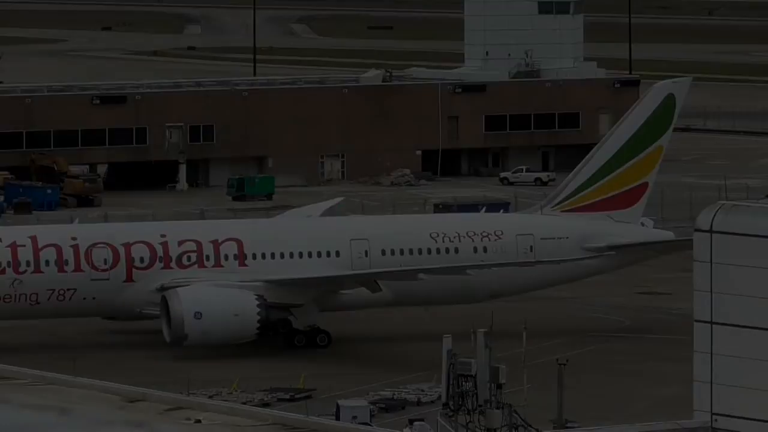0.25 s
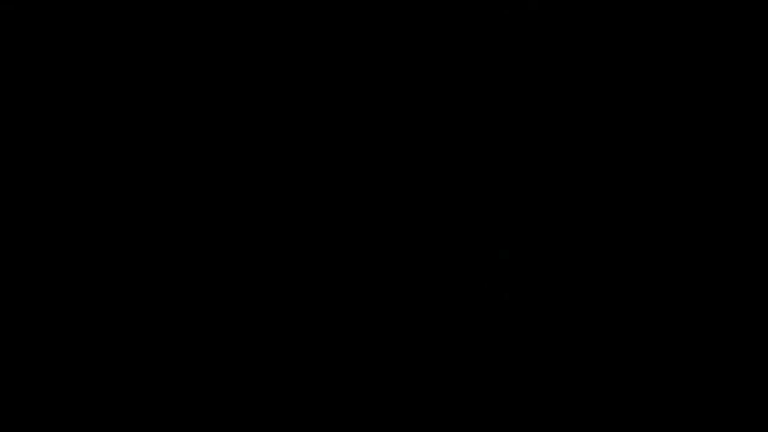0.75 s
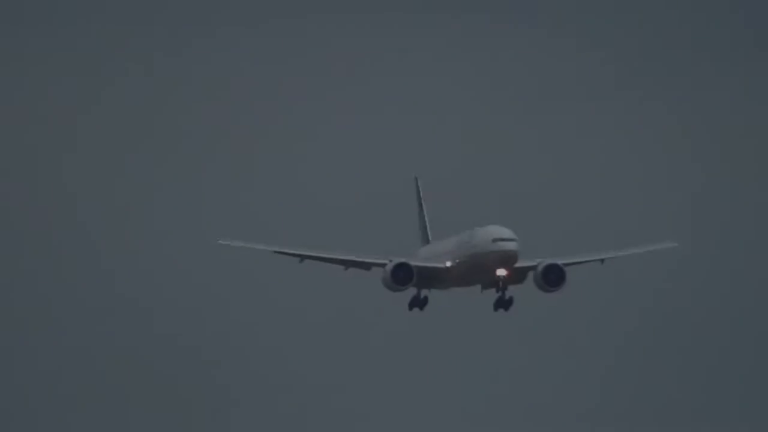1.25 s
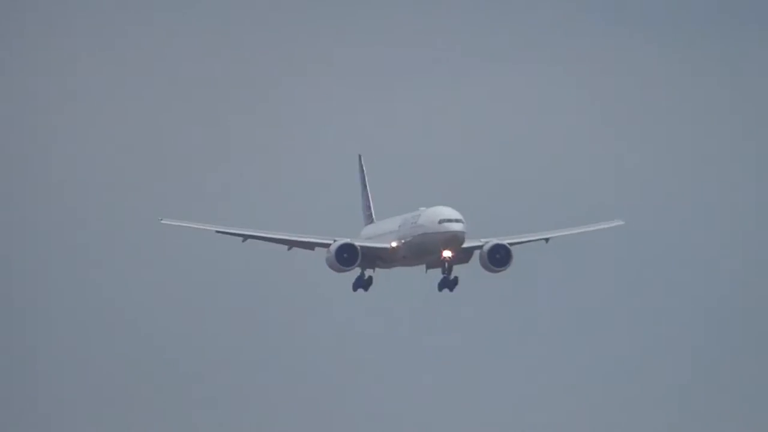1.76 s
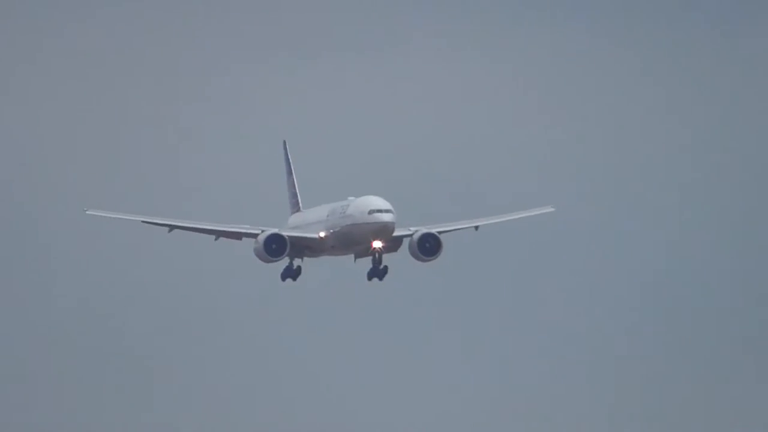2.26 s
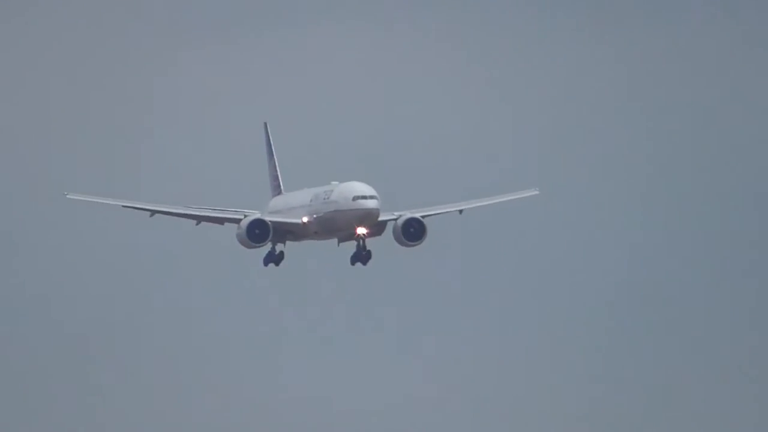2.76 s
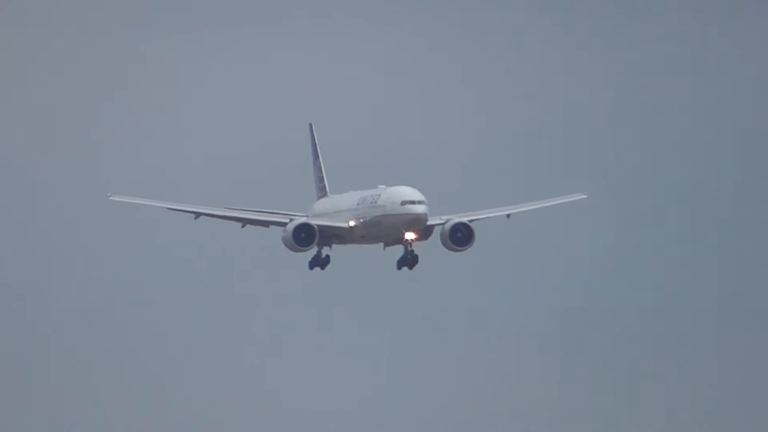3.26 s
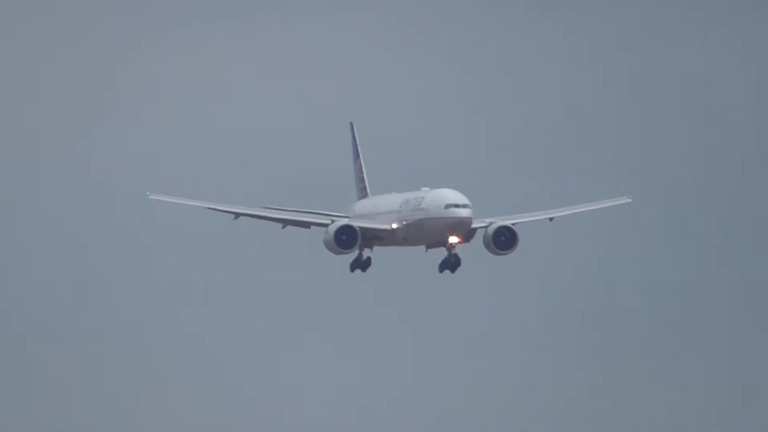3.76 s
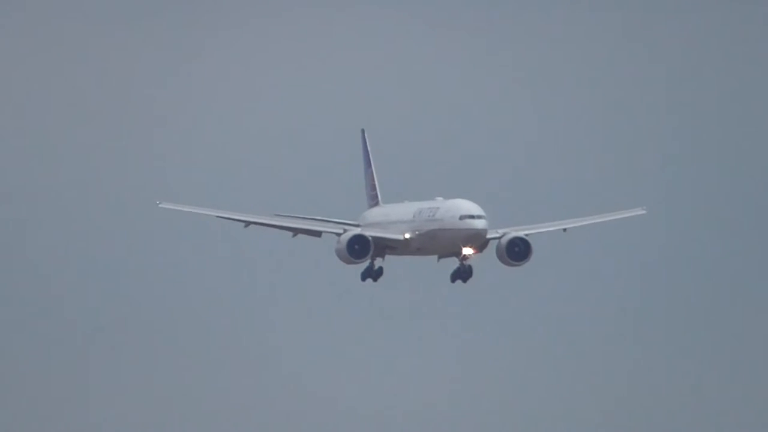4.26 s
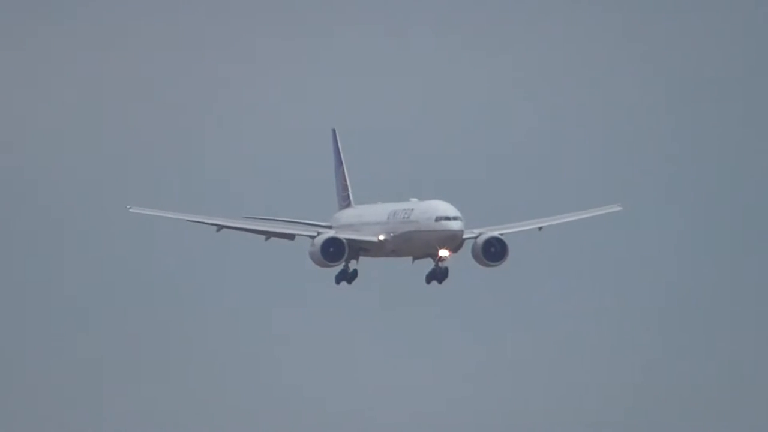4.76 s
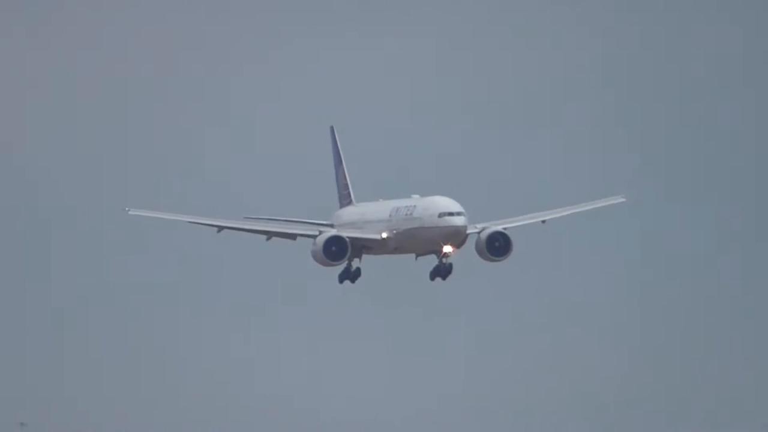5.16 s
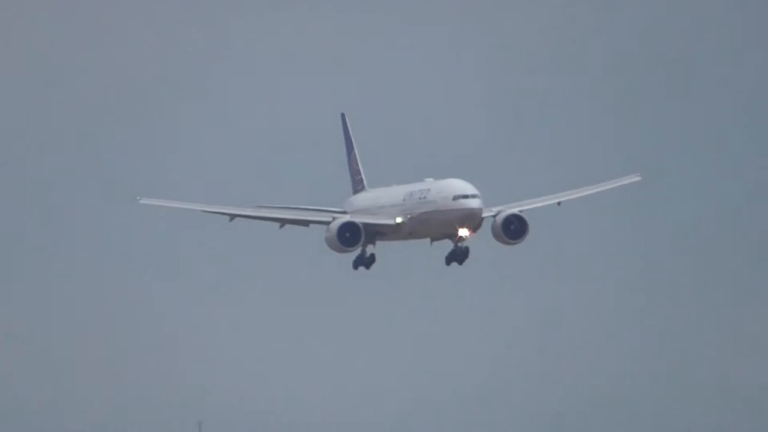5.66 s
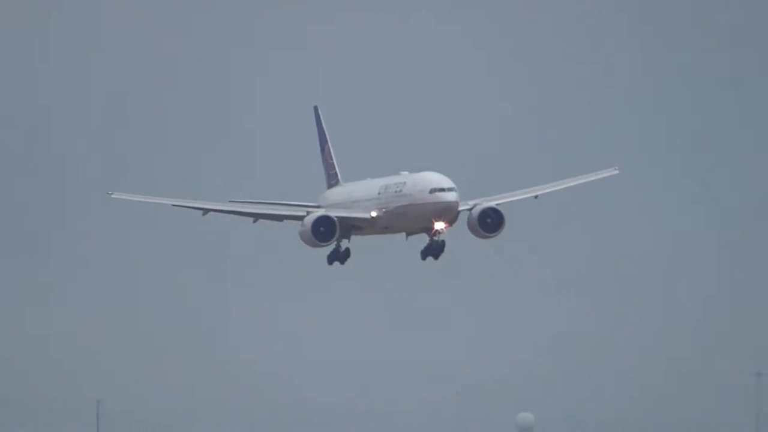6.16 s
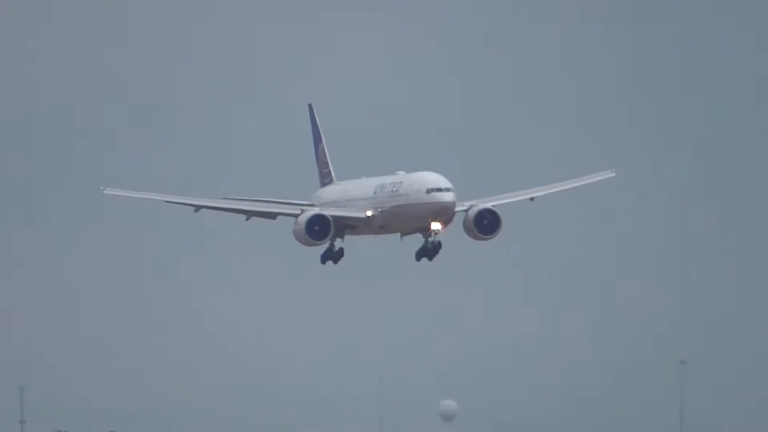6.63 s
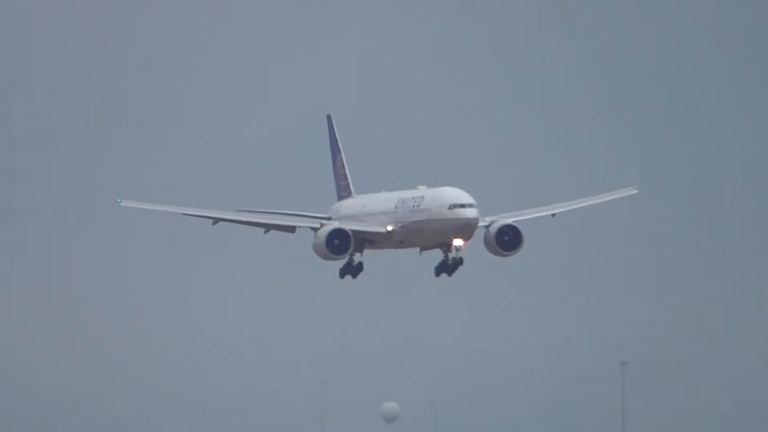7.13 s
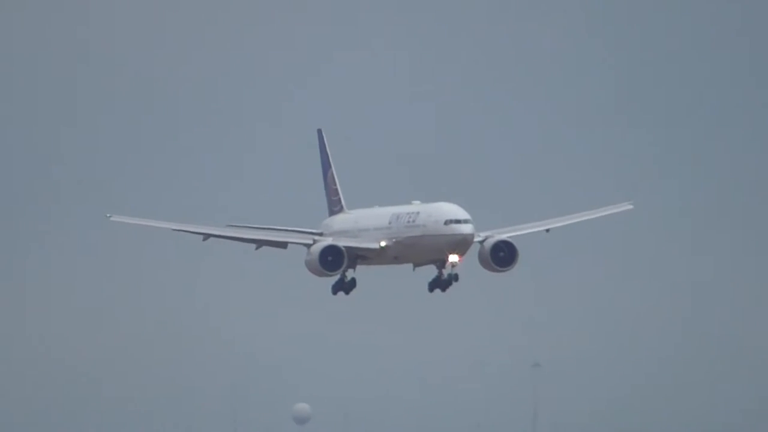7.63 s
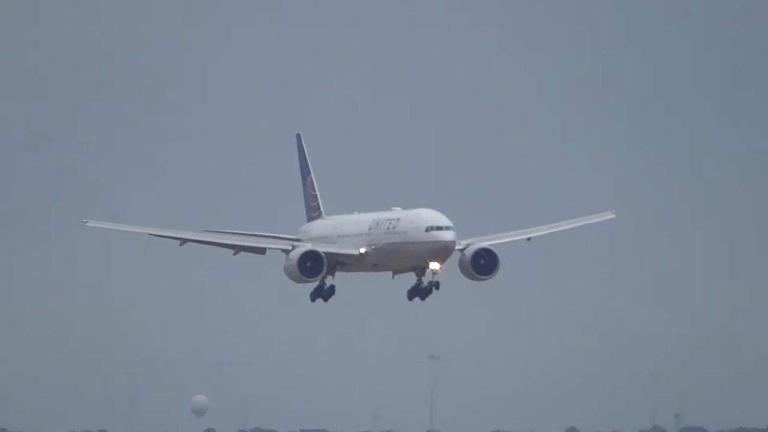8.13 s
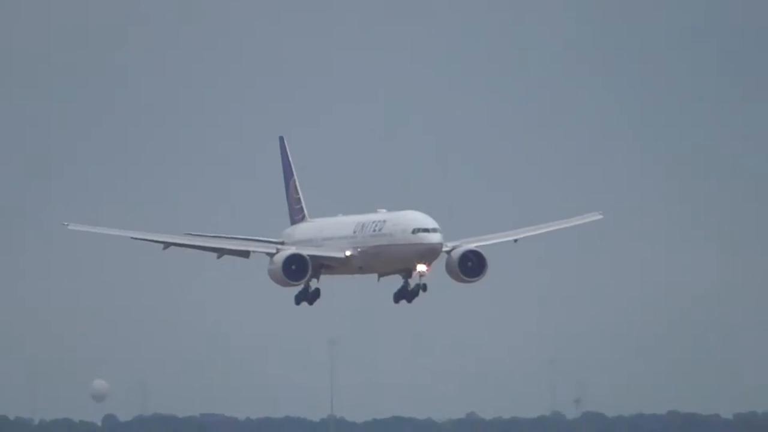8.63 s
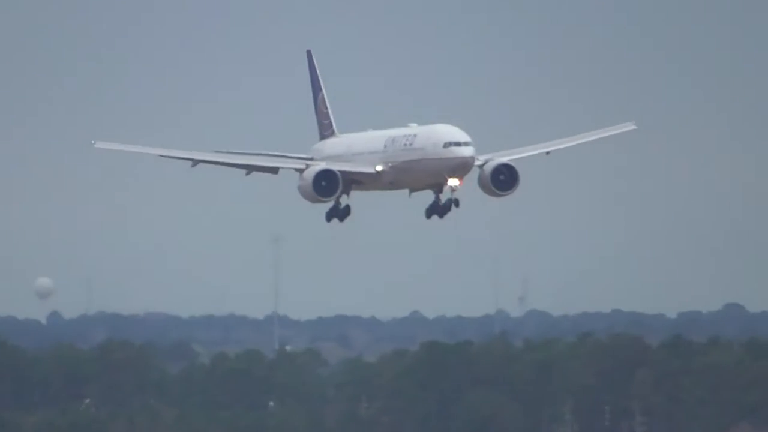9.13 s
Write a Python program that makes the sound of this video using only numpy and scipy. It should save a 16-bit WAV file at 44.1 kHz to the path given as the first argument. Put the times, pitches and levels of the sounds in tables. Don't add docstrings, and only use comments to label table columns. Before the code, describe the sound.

Quiet apron rumble fades away; an approaching twin-engine jet fades up, roaring steadily with a wavering hum and faint whine, then wind buffets the microphone.

```python
import sys
import numpy as np
from scipy import signal
from scipy.fft import rfft, irfft, next_fast_len
from scipy.io import wavfile
from scipy.ndimage import uniform_filter1d

SR = 44100
rng = np.random.default_rng(int(sys.argv[2]) if len(sys.argv) > 2 else 0)


def store_pcm(level_fs):
    pcm = np.round(np.clip(level_fs, -1, 1) * 32767).astype(np.int16)
    wavfile.write(sys.argv[1], SR, np.atleast_2d(pcm).T)


def magnitude_from_level(level_db):
    exponent = np.asarray(level_db, float) / 20
    return 10 ** exponent


N = 414099
SIZE = next_fast_len(N)
TIME, HZ = np.arange(N) / SR, np.maximum(np.fft.rfftfreq(SIZE, 1 / SR), 1)
FRAME, FRAME_START = 1024, 369


def curves(table):
    s, *columns = np.transpose(table)
    return [np.interp(TIME, s, c) for c in columns]


def swells(rows):
    return sum(db * np.exp(-((TIME - s) / half_s) ** 2) for s, half_s, db in rows)


def over_hz(hz, values):
    return np.interp(np.log(HZ), np.log(hz), values)


def unit(x):
    return x / np.sqrt(np.mean(np.abs(np.mean(np.atleast_2d(x), axis=0)) ** 2))


def walk(rate):
    k = int(SR / rate)
    held = np.repeat(rng.standard_normal(N // k + 1), k)
    return 0.529 * uniform_filter1d(uniform_filter1d(held, k), k)[:N]


def wave(spectra):
    return irfft(spectra, SIZE)[..., :N]


def between(x, lo_hz, hi_hz):
    return wave(rfft(x, SIZE) * ((HZ > lo_hz) & (HZ < hi_hz)))


# frequency in Hz, likeness from 0 to 1, left minus right in dB, left lead in rad.
PORTS = [(30, 0.7, -5, .5), (120, 1, -3.5, 0.36), (290, 0.81, 0, 0.35), (694, 0.73, 2.5, 0.5),
         (1390, 0.53, 3, 0.96), (2310, 0.2, 0, 0.9), (3500, 0.25, -3.5, 4.04), (4800, 0.6, -1.5, 4.4),
         (6000, 0.8, -11.5, 4.9), (7300, 0.8, 8, 4.7)]


def field(colour, lead=0.99):
    hz, *ports = np.transpose(PORTS)
    like, pan_db, phase = (over_hz(hz, c) for c in ports)
    like, phase = np.clip(like, 0, 1), lead * phase
    one, other = rfft(rng.standard_normal((2, SIZE)))
    left = magnitude_from_level(pan_db / 2) * one * np.exp(1j * phase)
    right = magnitude_from_level(-pan_db / 2) * (like * one + np.sqrt(1 - like ** 2) * other)
    mid = np.sqrt(magnitude_from_level(pan_db) + magnitude_from_level(-pan_db) + 2 * like * np.cos(phase))
    return np.array([left, right]) * magnitude_from_level(over_hz(*np.transpose(colour))) / mid


def tone(hz, blur_hz, steady, pan_db=0, like=1, lead=0, order=2):
    air = rng.standard_normal((3, N, 2)) @ [1, 1j]
    for _ in range(order):
        air = signal.lfilter([1], [1, -np.exp(-np.pi * blur_hz / SR)], air)
    like = np.clip(like, 0, 1)
    shimmer = steady + (like * air[0] + np.sqrt(1 - like ** 2) * air[1:]) / np.std(air)
    cycles = np.cumsum(hz * np.ones(N)) / SR
    carrier = np.exp(2j * np.pi * cycles + 1j * np.array([[lead], [0]]))
    return unit((shimmer * carrier).real * magnitude_from_level(np.array([[pan_db], [-pan_db]]) / 2))


# frequency in Hz, density in dB per Hz.
APRON_COLOUR = [(30, -25), (150, -4), (330, -8.5), (560, -15), (900, -15), (1400, -23.5), (1700, -31),
                (2700, -43.5), (5000, -48.5), (9000, -61), (15500, -66)]


def apron():
    return unit(wave(field(APRON_COLOUR, lead=-0.94))) * magnitude_from_level(-51.5)


def eddies(rows, cycles, against):
    out, t = np.zeros((2, N)), np.arange(-2048, 2048) / SR
    for (s, db, hz, pan_db), chance in zip(rows, rng.random((len(rows), 3))):
        eddy = 0
        for ratio, size, c in zip((.6, 1, 1.6), (.6, 1, .4), chance):
            eddy = eddy + size * np.cos(2 * np.pi * (hz * ratio * t + (c - .5) / 4))
        eddy = eddy * np.exp(-(t * hz / cycles) ** 2) * magnitude_from_level(db - 3.5)
        at = int(s * SR) - 2048
        out[:, at:at + 4096] += eddy * np.array([[magnitude_from_level(pan_db / 2)], [against * magnitude_from_level(-pan_db / 2)]])
    return out


# time in s, level in dB, pitch in Hz, left minus right in dB.
THUD = (.674, -74, 200, 13)


def thud():
    return eddies([THUD], 2.1, 0.92)


# time in s, level in dB, pitch in Hz, left minus right in dB.
PUFFS = [(7.999, -21, 139, 2), (8.033, -22, 170, -4), (8.066, -21.5, 145, 13), (8.123, -24, 160.0, 20),
         (8.265, -23, 179, -7), (8.31, -27.5, 109.8, -3), (8.384, -21, 141, -9), (8.504, -13, 190, -8),
         (8.526, -6.5, 227, -5), (8.561, -19, 170.7, 0), (8.585, -17, 120, -12.5), (8.639, -15, 177, -10),
         (8.688, -14, 131, -10), (8.714, -17, 155, -4), (8.911, -21.5, 159, -17), (8.962, -12, 144, -7.5),
         (9.034, -18, 153.2, -11), (9.085, -26, 120, -5), (9.22, -21, 150, -7), (9.243, -15, 176, -9),
         (9.29, -25, 110, -5)]


def wind_puffs():
    return eddies(PUFFS, 2.54, -0.75)


# time in s, share of patches heard from 0 to 1.
PATCHES = [(1.2, .95), (1.6, .92), (1.7, .68), (2.0, .72), (2.1, .95), (2.27, .8), (2.3, .08), (2.55, .15),
           (2.8, .32), (3.0, .15), (3.15, .45), (3.42, .45), (3.5, .12), (4.02, .14), (4.12, .6),
           (4.24, .75), (4.28, .15), (4.4, .6), (5.3, .72), (6.9, .6), (7.7, .34), (8.5, .45), (9.39, .58)]
# frequency in Hz, level of one grain in dB, factor on the share heard.
AIR = [(9500, -60, .35), (10300, -59, .7), (11300, -56, .45), (11800, -56, .8), (12700, -57.5, .9),
       (13300, -60, 1.05), (14100, -59.5, 1.25), (14500, -62, 1), (15130, -62, .8), (15180, -63, .15),
       (15600, -63, .12)]
# frequency in Hz, level of one grain in dB, share heard from 0 to 1.
SKIRT = [
    (9750, -48.5, .88),
    (10200, -50, .74),
    (10500, -51.5, .5),
    (11050, -54, .33),
]


def top_air():
    patch_lines, grain_share = 16, .24
    skirt_turn_s, air_alike_s, side_share = 2.55, 2.3, .07
    line, n = np.arange(448, 730), np.arange(2 * FRAME)
    hz, count = (line + .5) * SR / (2 * FRAME), N // FRAME + 1
    grain = np.cos(np.pi / FRAME * np.outer(line + .5, n + .5 + FRAME / 2))
    grain = grain * signal.windows.kaiser_bessel_derived(2 * FRAME, 4 * np.pi)
    s = (FRAME_START + FRAME * (np.arange(count)[:, None] + 1)) / SR
    air_hz, air_db, factor = np.transpose(AIR)
    skirt_hz, skirt_db, skirt_kept = np.transpose(SKIRT)
    alike = s > skirt_turn_s
    skirt = (hz < skirt_hz[-1]) & np.array([alike, ~alike])
    db = np.where(skirt, np.interp(hz, skirt_hz, skirt_db), np.interp(hz, air_hz, air_db))
    db = db + 1.5 * rng.standard_normal((count, 1))
    kept = np.interp(s, *np.transpose(PATCHES)) * np.interp(hz, air_hz, factor)
    kept = np.array([kept, kept * np.where(s < air_alike_s, 1, side_share)])
    kept = np.where(skirt, np.interp(hz, skirt_hz, skirt_kept) * (hz > skirt_hz[0]), kept)
    chance = .65 * rng.standard_normal((count, 1))
    chance = chance + .76 * rng.standard_normal((2, count, 64))[..., line // patch_lines]
    heard = 1 / (1 + np.exp(1.7 * chance)) < kept
    draw = rng.random(kept.shape)
    size = heard * np.where(draw < grain_share, np.sign(draw - grain_share / 2), 0)
    frames = (size * magnitude_from_level(db)) @ grain * np.sqrt(2 / FRAME)
    out = np.zeros((2, count + 1, FRAME))
    out[:, :-1] += frames[..., :FRAME]
    out[:, 1:] += frames[..., FRAME:]
    mid, side = np.pad(out.reshape(2, -1), ((0, 0), (FRAME_START, 0)))[:, :N]
    return np.array([mid + side, mid - side])


# start in s, length in s, pitch in Hz, glide in Hz per s, level in dB.
SQUEAK = [
    (8.75, .11, 9370, 800, -61),
    (8.84, .12, 9450, -700, -61),
    (9.05, .09, 9420, -100, -63),
    (9.25, .17, 9420, -1300, -59),
]


def squeak():
    hz, size = np.full(N, 1. * SQUEAK[0][2]), 0
    for s, length_s, start_hz, glide, db in SQUEAK:
        since = TIME - s
        hz = np.where(since > 0, start_hz + glide * np.minimum(since, length_s), hz)
        edge = np.clip(np.minimum(since, length_s - since) / .025, 0, 1)
        size = size + magnitude_from_level(db + 2.0) * edge
    return size * tone(hz, blur_hz=45, steady=.7)[0]


# time in s, level in dB.
WHINE = [(1.1, -48.5), (2.0, -45), (2.7, -45.5), (2.95, -43.5), (3.25, -46.5), (3.55, -43), (3.85, -39.5),
         (4.4, -47), (5.5, -50), (6.5, -47), (6.8, -50), (7.0, -46.5), (8.0, -44), (8.7, -45),
         (9.39, -45.5)]


def whine():
    db, = curves(WHINE)
    core = tone(8676 + 11 * walk(4), blur_hz=46, steady=0.27, order=1)[0]
    skirt = magnitude_from_level(-4.0) * tone(8500, blur_hz=595, steady=0, order=1)[0]
    skirt = skirt + magnitude_from_level(-8.5) * tone(8640, blur_hz=230, steady=0, order=1)[0]
    return unit(core + skirt) * magnitude_from_level(db + 3.6 * walk(45))


# time in s, half length in s, lift in dB.
HISS_SWELLS = [
    (1.75, 0.091, 2),
    (2.79, 0.045, 4),
    (3.8, .12, 2),
    (4.3, .25, 1),
    (8.3, .1, 1),
    (9.25, 0.13, 2.5),
]
# low edge in Hz, high edge in Hz,
# hiss in dB, left minus right in dB, time in s at which the signs turn alike.
SHARED = [
    (7500, 8250, -58.5, .5, 3.0),
    (8250, 9000, -60, 1.8, 2.755),
    (9000, 9750, -61, 0, 2.61),
    (9750, 10500, -70, 0, 2.55),
]
SHARED_TRIM = [-3, -11, -5, -19]
STEP_DB = (1.5, .8, 2.5, 2)
# time in s, band number from 0.
BLINKS = [(2.375, 2), (2.375, 3), (3.19, 2), (3.36, 2), (3.7, 2), (3.85, 2), (4.09, 2), (4.93, 2),
          (7.08, 2), (7.16, 2), (7.58, 2), (8.06, 2), (8.088, 2), (3.15, 0), (3.33, 0), (3.62, 0),
          (4.73, 0), (4.93, 0), (7.23, 0), (7.08, 3), (8.06, 3)]


def shared_treble():
    tones, line = whine() + squeak(), magnitude_from_level(-78) * np.sin(2 * np.pi * 10001 * TIME)
    frame = (np.arange(N) + FRAME - FRAME_START) // FRAME
    out = 0
    for k, (lo_hz, hi_hz, db, pan_db, turn_s) in enumerate(SHARED):
        alike = TIME > turn_s
        for s, band in BLINKS:
            alike = alike ^ ((band == k) & (abs(TIME - s) < .013))
        sign = uniform_filter1d(2. * alike - 1, size=256)
        both = between(tones * magnitude_from_level((-24, -.1, -7, -45)[k]) + line, lo_hz, hi_hz)
        hiss_db = db + SHARED_TRIM[k] + 2.8 * walk(30) + (k != 1) * swells(HISS_SWELLS[2:])
        both = both + magnitude_from_level(hiss_db) * unit(between(rng.standard_normal(N), lo_hz, hi_hz))
        step_db = STEP_DB[k] * rng.standard_normal(N // FRAME + 2)[frame]
        both = between(both * magnitude_from_level(uniform_filter1d(step_db, size=300)), lo_hz, hi_hz)
        if k == 3:
            kept = rng.random(N // FRAME + 2)[((TIME + .008) * SR / FRAME).astype(int)] > .3
            both = between(both * uniform_filter1d(1. * kept, size=300), lo_hz, hi_hz)
        apart_db = db - np.where(alike, (26, 26, 34, 60)[k], (10, 8, 45, 45)[k])
        apart = magnitude_from_level(apart_db) * unit(between(rng.standard_normal(N), lo_hz, hi_hz))
        left = both * magnitude_from_level(pan_db / 2) + apart
        right = sign * both * magnitude_from_level(-pan_db / 2) - sign * apart
        out = out + np.array([left, right])
    return out


# time in s, half length in s, pitch in Hz, level in dB.
BOOMS = [(6.72, .08, 216, -30), (6.85, .09, 185, -31), (6.951, .2, 79.7, -33.5), (7.221, .1, 244.8, -31.5),
         (7.36, .06, 204.6, -35), (7.6, .12, 70, -36), (8.03, .1, 200, -33), (8.3, .14, 208.4, -30),
         (8.5, .1, 75, -35), (8.68, .07, 89.9, -32), (8.848, 0.132, 84.2, -31.5), (8.8, .15, 256, -34),
         (3.952, .15, 200, -34.5), (5.4, .12, 541, -37.5), (9.1, .08, 75, -34.5)]


def booms():
    bells = np.array([magnitude_from_level(db) * np.exp(-((TIME - s) / half_s) ** 2) for s, half_s, hz, db in BOOMS])
    out = 0
    for part in (slice(0, None, 2), slice(1, None, 2)):
        hz = np.array(BOOMS)[part, 2][np.argmax(bells[part] + 1e-30, axis=0)]
        lump = tone(hz, blur_hz=45, steady=0.44, pan_db=-1.5, like=0.87, lead=.4)
        out = out + bells[part].sum(axis=0) * lump
    return out


# time in s, turn from 0 to 1.
TURN = [
    (1.7, 0.34),
    (2.6, 0.05),
    (3.6, 0.13),
    (4.8, 0.42),
    (6.0, 0.86),
    (7.5, 0.66),
    (9.39, 1),
]


def turned_away():
    return curves(TURN)[0]


# time in s, pitch in Hz, level in dB.
FAN = [(.8, 943, -37), (1.6, 947, -36), (1.72, 945, -31.5), (2.1, 946, -31), (2.4, 946, -28),
       (3.0, 941.5, -31.5), (3.25, 935, -36), (3.6, 939, -40.5), (4.2, 936, -39), (5.4, 937, -44),
       (5.9, 933, -42), (6.1, 910, -42.5), (6.4, 910, -49), (6.75, 857, -48.5), (7.4, 819, -45),
       (8.1, 821, -48), (9.39, 823, -56)]
# time in s, pitch in Hz, level in dB.
HUM = [(1.5, 335, -49), (1.9, 333, -37), (2.4, 332.2, -33), (2.6, 332, -36), (3.1, 332, -32.5),
       (3.6, 332.5, -30), (4.4, 331, -32), (5.4, 329.9, -31), (6.2, 331, -33), (6.9, 332, -34),
       (7.2, 332, -39.5), (7.6, 331.1, -44), (9.39, 331, -50)]
# pitch in Hz, level in dB, blur in Hz, left minus right in dB, left lead in rad.
FAINT = [
    (3946, -71, 40, -1.5, 4.4),
    (4736, -75, 34, -5, 4.2),
    (5737, -84, 40, -8, 4.8),
]
# time in s, half length in s, lift in dB.
GLINTS = [(1.72, 0.062, 4), (1.91, 0.035, 6), (2.33, 0.056, 2.5), (2.47, .04, 2), (3.33, 0.049, 2.5),
          (3.85, 0.075, 9), (4.3, 0.069, 1), (4.53, .04, 1), (5.93, .08, 4), (6.35, .05, 8), (8.1, .07, 1),
          (8.9, .06, 4)]


def engines():
    hz, db = curves(FAN)
    clear_db = swells(GLINTS)
    out = magnitude_from_level(db + clear_db) * tone(hz, blur_hz=72, steady=.9, pan_db=6.5, like=.97, lead=.8)
    octave_db = -55 + 0.3 * (db + clear_db + 35)
    out += magnitude_from_level(octave_db) * tone(1.98 * hz, blur_hz=95, steady=.35, pan_db=6, like=.95, lead=1.2)
    hz, db = curves(HUM)
    out += magnitude_from_level(db) * tone(hz, blur_hz=28, steady=1.25, pan_db=.3, like=.97, lead=.08)
    turn = turned_away()
    for hz, db, blur, pan_db, lead in FAINT:
        line_db = db + 3.0 - 3.0 * turn + 1.4 * (1 - turn) * clear_db + 3.0 * walk(5.4)
        out += magnitude_from_level(line_db) * tone(hz, blur, 0.35, pan_db, 0.9, lead)
    return out


# frequency in Hz, density in dB per Hz.
ROAR = [(10, -67), (30, -34), (74, -7), (208, -2.5), (300, -5), (400, -7.5), (500, -7.5), (714, -11),
        (1050, -14), (1420, -20), (1730, -30.5), (1900, -31), (2150, -35), (2920, -42), (3850, -43),
        (4500, -48.5), (5150, -47.5), (6060, -54.5), (7400, -49.5)]
SPLIT_HZ = (50, 260, 700, 2400)
# level facing in dB, change when turned away in dB, share of a gust from 0 to 1.
RANGES = [
    (-44.5, -4, 0.2),
    (-35.7, 4.5, 0.75),
    (-31.3, -4.5, 0.24),
    (-36, -5.5, 0.01),
    (-51.5, -2, 0.04),
]
# centre in Hz, blur in Hz, level facing in dB,
# change when turned away in dB, share of a gust.
HUMPS = [
    (88.05, 35, -43, 0, .3),
    (205.9, 87, -41, 1, 1.14),
    (1552, 230, -64, 3.5, 0.1),
    (2100, 400, -54, -7.5, 0.1),
    (3737, 330, -67, -3.5, .1),
]
# time in s, half length in s, lift in dB.
GUSTS = [
    (2.947, 0.11, 2.5),
    (3.4, 0.67, 2.5),
    (4.35, 0.27, 3.5),
    (6.86, 0.26, 6),
    (7.951, 0.15, 2.5),
    (8.35, 0.19, 4),
    (8.806, 0.18, 0),
]


def roar():
    spectra = field(ROAR) * (HZ < 7500)
    above = [1] + [1 / (1 + (hz / HZ) ** 4) for hz in SPLIT_HZ] + [0]
    turn, gust_db = turned_away(), swells(GUSTS)
    out = 0
    for k, (db, away_db, share) in enumerate(RANGES):
        band = unit(wave(spectra * (above[k] - above[k + 1])))
        band_db = db + away_db * turn + share * gust_db + 0.86 * walk(9.8)
        out = out + band * magnitude_from_level(band_db + (k == 4) * swells(HISS_SWELLS))
    for hz, blur, db, away_db, share in HUMPS:
        out = out + magnitude_from_level(db + away_db * turn + share * gust_db) * tone(hz, blur, 0, 0, 0.72, 0.58)
    return out


# time in s, gain in dB.
FADE_OUT = [
    (0, 4),
    (.62, -36),
    (.7, -38),
    (.71, -93.5),
]
# time in s, gain in dB.
FADE_IN = [
    (.69, -110),
    (.705, -59.5),
    (1.2, -26),
    (1.62, -3),
    (1.7, 0.5),
]


def scene():
    approach = wind_puffs() + top_air() + shared_treble() + booms() + engines() + roar()
    return apron() * magnitude_from_level(curves(FADE_OUT)[0]) + thud() + approach * magnitude_from_level(curves(FADE_IN)[0])


def band_limit(x):
    return signal.sosfilt(signal.butter(12, 15730, fs=SR, output="sos"), x)


def record(dry):
    return band_limit(dry)


dry = scene()
out = record(dry)
store_pcm(out)
```